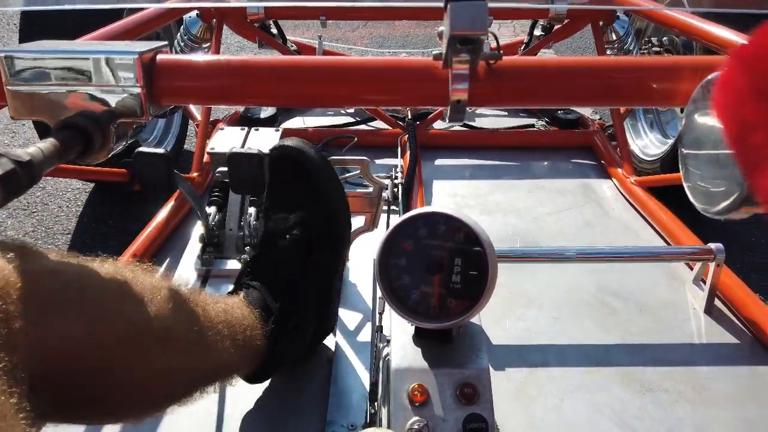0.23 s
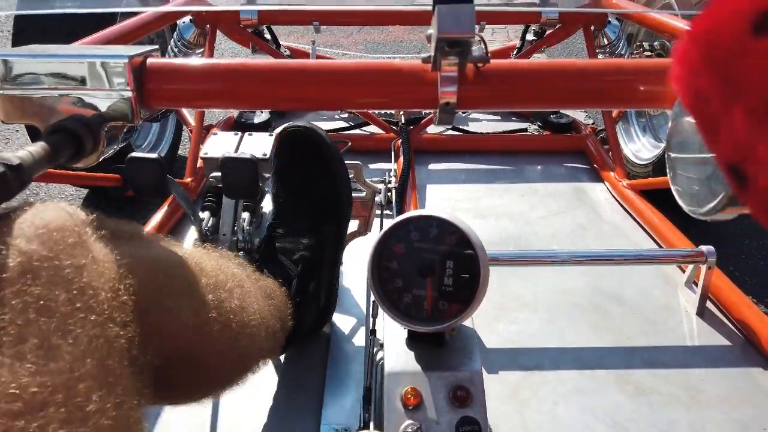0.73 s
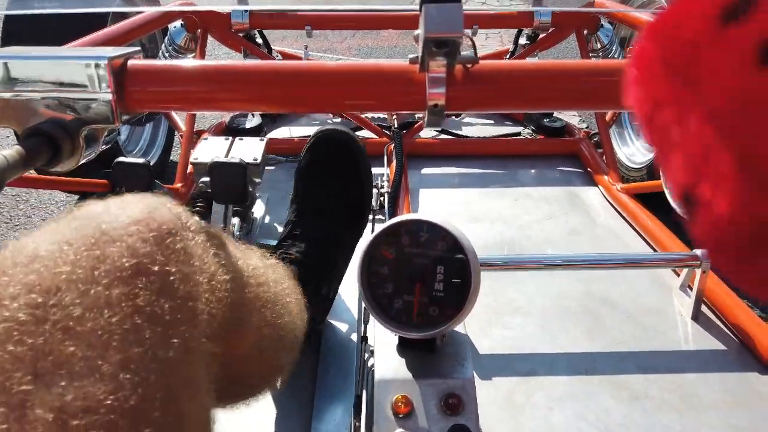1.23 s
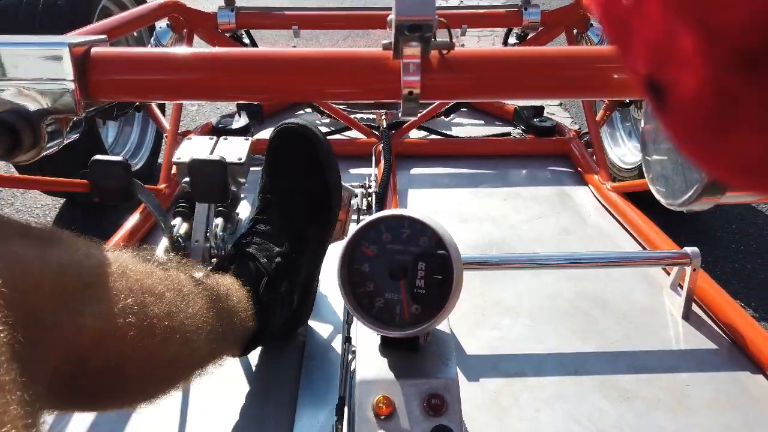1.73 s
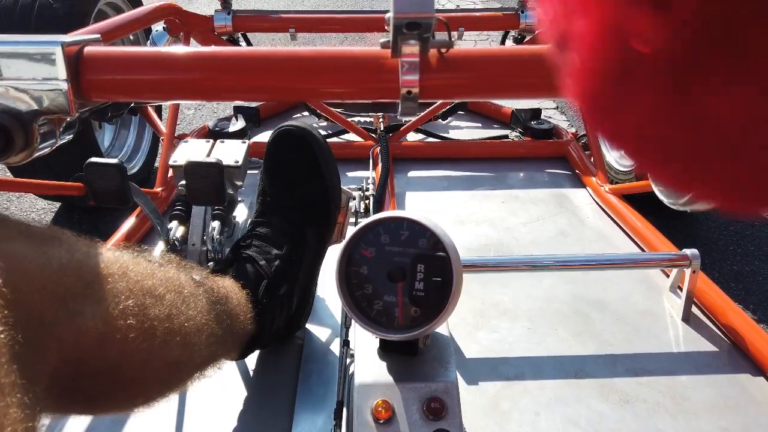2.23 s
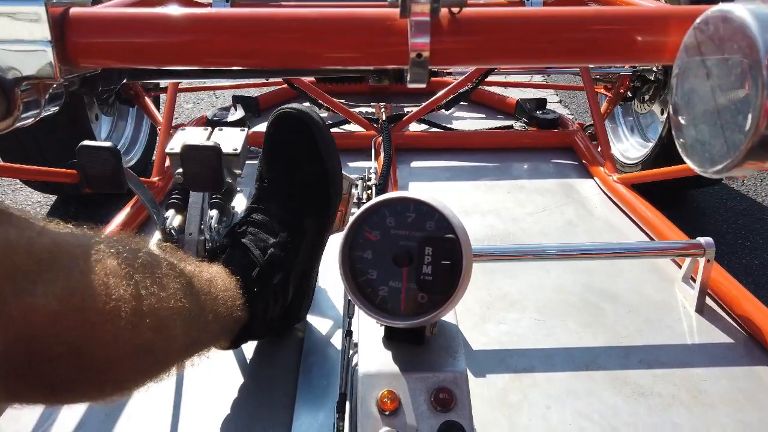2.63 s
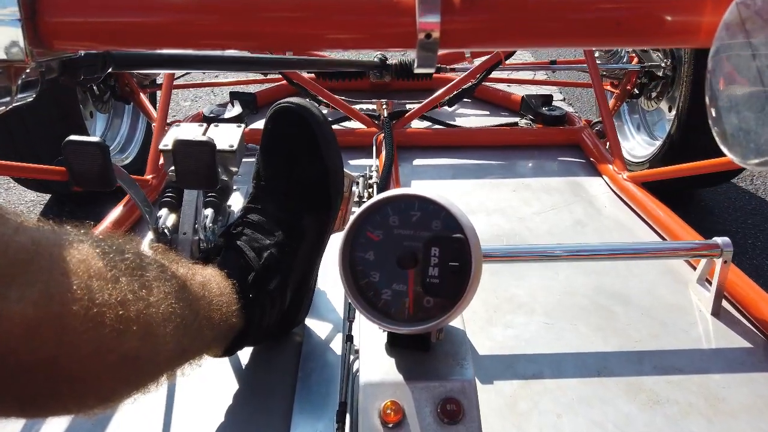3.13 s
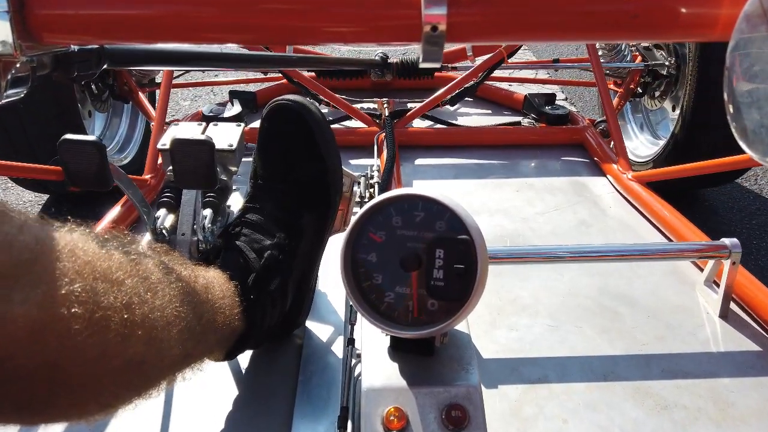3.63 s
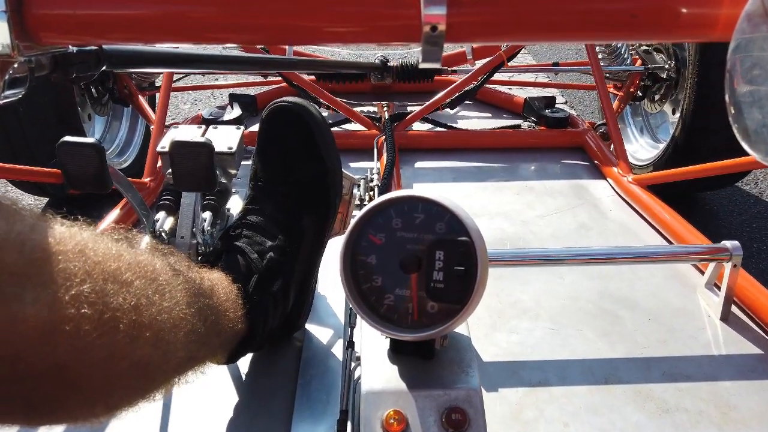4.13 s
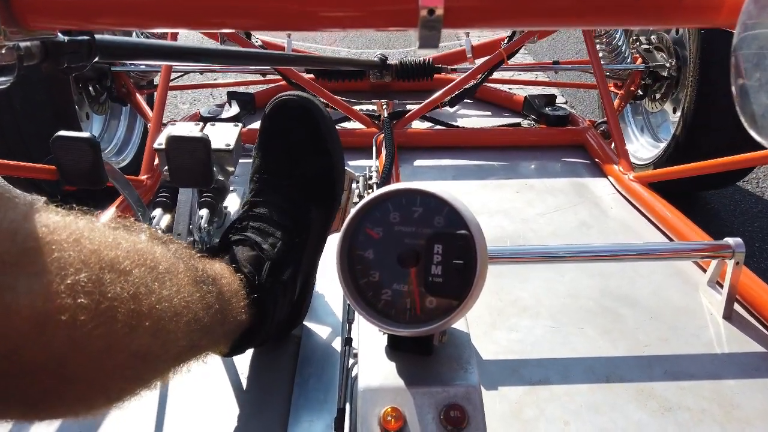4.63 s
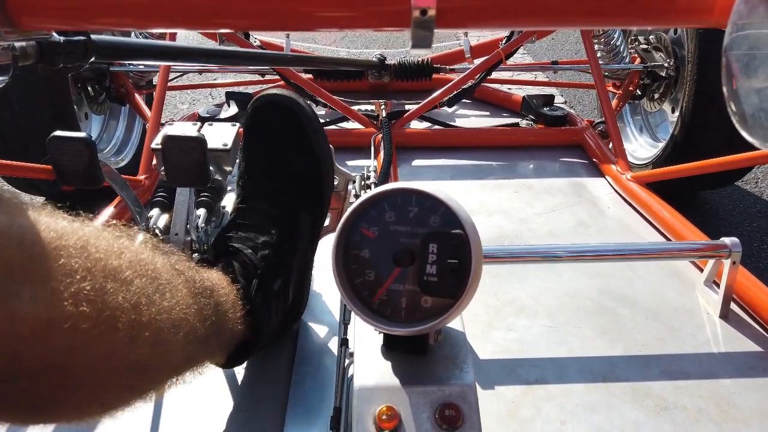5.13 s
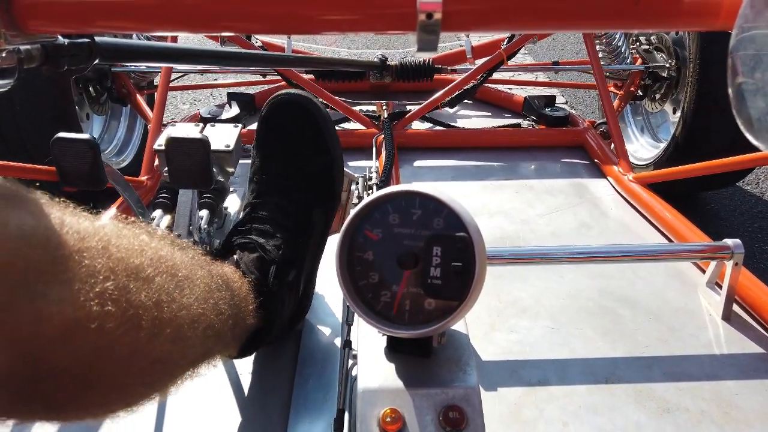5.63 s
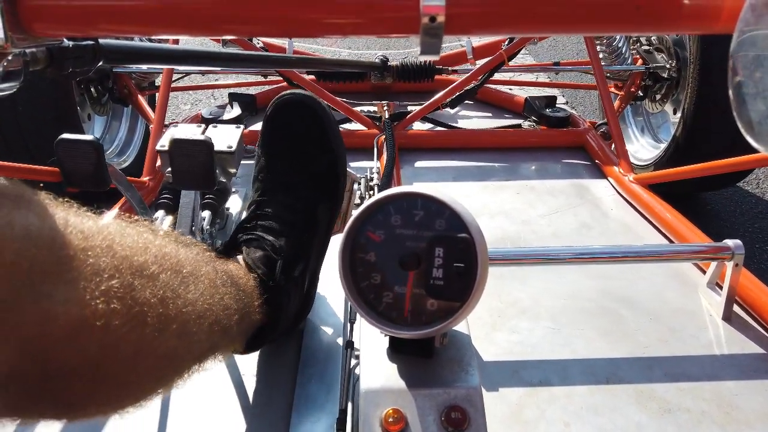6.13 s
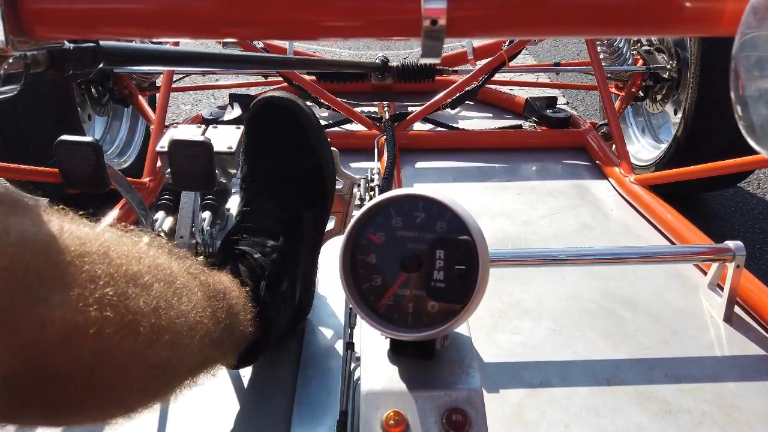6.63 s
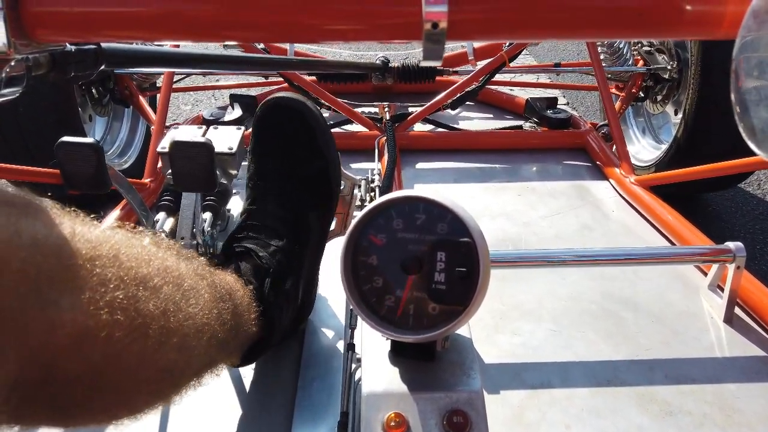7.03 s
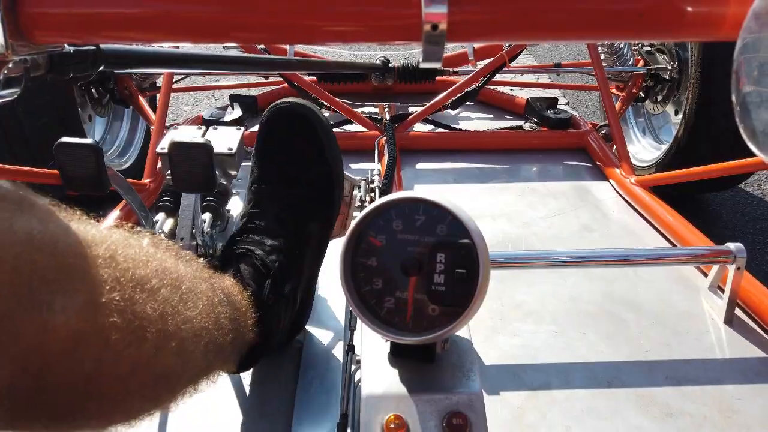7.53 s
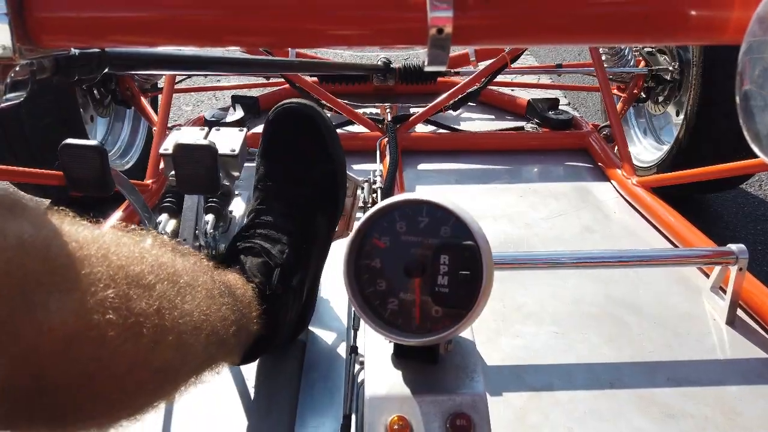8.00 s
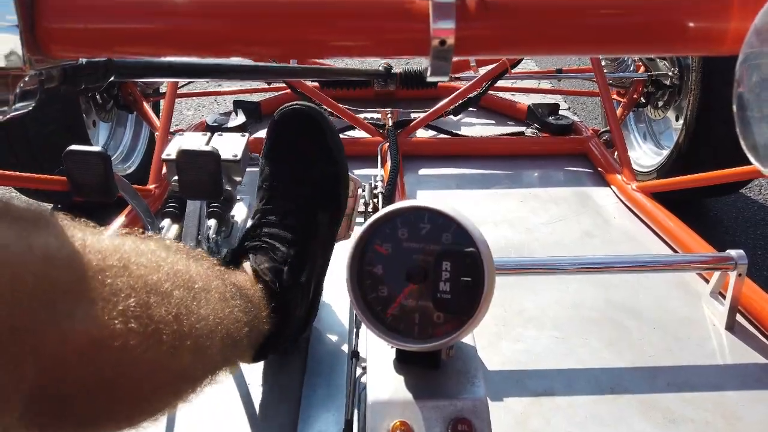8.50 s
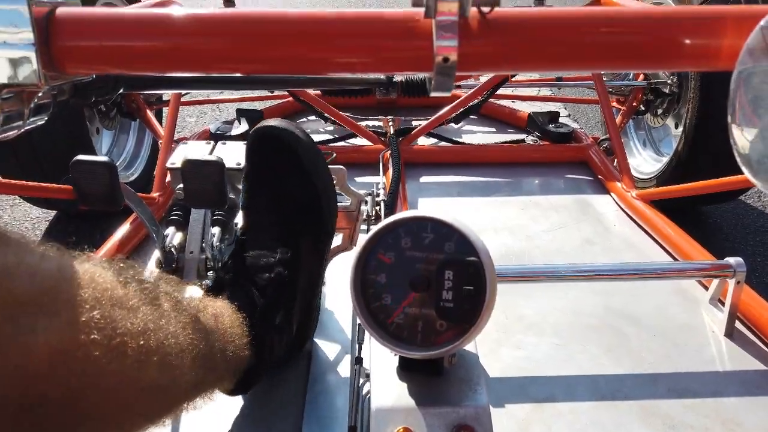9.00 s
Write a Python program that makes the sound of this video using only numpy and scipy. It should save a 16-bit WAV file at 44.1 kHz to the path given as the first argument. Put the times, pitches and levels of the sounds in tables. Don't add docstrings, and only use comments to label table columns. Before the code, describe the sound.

A small camera at the driver's seat hears a bassy, irregular exhaust putter, case rattle, airy fan noise and ticking valves for nearly five seconds. Three quick throttle stabs follow, with dry, high squeaks from the pedal linkage. Each swells into a rough exhaust blast and rushing air, then drops to a smooth descending hum. The last blip is strongest and is still winding down at the end. No room echo.

```python
import sys
import numpy as np
from scipy import signal
from scipy.fft import rfft, irfft, next_fast_len
from scipy.io import wavfile

SR = 44100
rng = np.random.default_rng(int(sys.argv[2]) if len(sys.argv) > 2 else 0)


def pcm_store(signal):
    levels = np.round(np.clip(np.atleast_2d(signal), -1, 1) * 32767)
    wavfile.write(sys.argv[1], SR, levels.astype(np.int16).T)


def volts_from_db(level):
    exponent = np.asarray(level, float) / 20
    return 10 ** exponent


N = 408366

# time in seconds, speed in turns per minute.
CRANK_SPEED = [(0.0, 785.3), (0.2, 789.0), (0.4, 755.1), (0.6, 771.8), (0.8, 754.1), (1.0, 800.5),
               (1.2, 769.2), (1.4, 775.5), (1.6, 783.0), (1.8, 776.9), (2.0, 792.5), (2.2, 794.4),
               (2.4, 808.2), (2.6, 800.6), (2.8, 792.6), (3.0, 761.5), (3.2, 778.6), (3.4, 794.9),
               (3.6, 787.4), (3.8, 816.8), (4.0, 800.2), (4.2, 782.6), (4.4, 761.0), (4.6, 764.2),
               (4.75, 821.5), (4.85, 864.1), (4.9, 1074.4), (4.96, 1507.4), (5.03, 2044.6), (5.08, 2376.4),
               (5.13, 2311.8), (5.25, 2040.8), (5.4, 1736.9), (5.6, 1405.0), (5.8, 1082.4), (6.0, 842.7),
               (6.15, 770.3), (6.26, 825.1), (6.31, 1147.5), (6.38, 1657.0), (6.45, 2135.1), (6.5, 2390.7),
               (6.56, 2253.0), (6.7, 1957.1), (6.85, 1675.4), (7.0, 1422.3), (7.2, 1127.3), (7.4, 884.7),
               (7.6, 746.0), (7.8, 718.4), (8.0, 752.6), (8.15, 762.2), (8.25, 853.7), (8.31, 1088.9),
               (8.4, 1624.7), (8.5, 2210.7), (8.6, 2927.0), (8.65, 3328.1), (8.72, 2763.6), (8.85, 2460.3),
               (9.0, 2151.5), (9.13, 1893.1), (9.26, 1599.6)]
# time in seconds, strength in dB against a full firing.
LEAN_FIRINGS = [(0.073, -6), (0.149, -29), (0.225, -25), (0.264, -0.5), (0.302, -9), (0.381, -5),
                (0.46, -17.5), (0.539, -1.5), (0.617, -22), (0.695, -16.5), (0.774, -2.5), (0.853, -4.5),
                (0.93, -28), (1.006, -19), (1.158, -27), (1.236, -16), (1.314, -7), (1.391, -6),
                (1.469, -6), (1.546, -20), (1.622, -1), (1.661, -5), (1.699, -4), (1.776, -16), (1.815, -1),
                (1.853, -21), (1.93, -1), (1.968, -2.5), (2.006, -3), (2.081, -29), (2.157, -6),
                (2.308, -26), (2.345, -1), (2.382, -13), (2.456, -1), (2.531, -8), (2.606, -27.5),
                (2.681, -25.5), (2.719, -1), (2.756, -14), (2.832, -11), (2.909, -21.5), (2.987, -11),
                (3.065, -8), (3.143, -11), (3.182, -1), (3.22, -6), (3.297, -4), (3.373, -32), (3.449, -19),
                (3.524, -14.5), (3.6, -12), (3.676, -27), (3.751, -8), (3.824, -21), (3.973, -16),
                (4.048, -16), (4.124, -32), (4.2, -7), (4.238, -3), (4.277, -26), (4.355, -17), (4.434, -7),
                (4.512, -6), (4.591, -5), (4.63, -4), (5.725, -8), (5.75, -8), (5.777, -5.5), (5.832, -26),
                (5.862, -14), (5.892, -12.5), (5.923, -9), (5.991, -28), (6.026, -9), (6.063, -3.5),
                (7.223, -19), (7.251, -22), (7.309, -30), (7.34, -1), (7.372, -13), (7.44, -10),
                (7.476, -4), (7.512, -13), (7.589, -29), (7.63, -0.5), (7.67, -24), (7.752, -21),
                (7.835, -1), (7.877, -1), (7.917, -12), (7.998, -10), (8.077, -1), (8.117, -1)]
# time in seconds, pipe ring in dB, open-throttle blast in dB, shut-throttle hum in dB.
EXHAUST_LEVELS = [(0, -16.5, -45, -40), (1, -17, -32, -48), (2, -19.5, -25, -43), (3, -18, -45, -44),
                  (4.1, -17, -36, -45), (4.55, -20, -43, -53), (4.8, -19.5, -23.5, -57),
                  (4.88, -20, -21.5, -60), (4.92, -23, -14.5, -60), (5.06, -22, -7.5, -47),
                  (5.09, -18, -9.5, -40), (5.13, -49, -27, -19.5), (5.35, -50, -44, -19),
                  (5.6, -48, -24, -26), (5.72, -18.5, -39, -36), (5.95, -20.5, -35, -40.5),
                  (6.25, -27.5, -33, -58), (6.3, -20, -13.5, -60), (6.45, -30, -9, -48),
                  (6.5, -20, -13.5, -33), (6.55, -33, -36, -19), (6.8, -50, -41, -20.5),
                  (7.05, -59, -27, -28.5), (7.2, -24.5, -45, -38), (7.55, -21.5, -43, -58),
                  (7.8, -24.5, -52, -60), (8.23, -28.5, -30.5, -60), (8.27, -17, -23, -60),
                  (8.4, -31, -10.5, -60), (8.55, -36, -3.5, -50), (8.63, -27, -8, -15),
                  (8.67, -52, -26, -19), (8.85, -53, -42, -24.5), (9.03, -50, -47, -20.5),
                  (9.26, -50, -48, -22.5)]
# pitch in Hz, level in dB, time to fade by 60 dB in seconds.
PIPE_MODES = [(53.3, 2.5, 0.33), (113, -20.5, 0.19), (157.2, 3.5, 0.15), (204, -10.5, 0.053),
              (420, -20, .1)]
# pitch in Hz, level in dB, time to fade by 60 dB in seconds.
BLAST_MODES = [(84.6, -2, 0.021), (164, 4.5, 0.045), (236, -19.5, 0.021), (375, 3, 0.033)]
# multiple of the firing rate, level in dB.
HUM_OVERTONES = [(1, 5), (2, -3.5), (3, -6.5), (4, -15.5)]
# pitch in Hz, level in dB.
HUM_PIPE_RESPONSE = [(40, -5.5), (60, -1.5), (95, -1), (110, -7), (150, 2), (185, -4), (225, -2),
                     (255, -10.5), (400, -17)]
# pitch in Hz, level in dB per Hz.
RASP_SPECTRUM = [(150, -32), (250, 1), (609, -8), (660, -5), (795, -11), (1350, -6), (2160, -14.5),
                 (2330, -22), (6000, -63), (7800, -68), (13200, -120)]
# time in seconds, clatter in dB, fan and intake hiss in dB.
NOISE_LEVELS = [
    [(0.0, -39.5, -46.5), (0.12, -41, -46.5), (1.95, -42.5, -45), (2.25, -42.5, -45), (2.57, -42, -45.5),
     (3.13, -49, -48), (3.3, -42.5, -44.5), (4.23, -44.5, -49), (4.33, -46, -49), (4.61, -44.5, -50),
     (4.7, -44.5, -47)],
    [(4.75, -45.5, -46), (4.89, -44.5, -46), (4.91, -27, -39), (4.92, -41, -41), (4.94, -33.5, -44),
     (5.04, -30, -36.5), (5.2, -35.5, -39), (5.62, -41, -44.5), (5.97, -47, -51.5), (6.04, -50, -54.5),
     (6.26, -48, -52), (6.29, -39.5, -44), (6.38, -31, -37), (6.43, -30, -37.5), (6.57, -36, -38.5),
     (7.09, -42.5, -46), (7.39, -48.5, -52), (7.7, -52.5, -56.5), (8.24, -53, -54.5), (8.27, -37, -42),
     (8.28, -45, -46.5), (8.42, -29.5, -37.5), (8.57, -27.5, -33), (8.71, -32, -33.5), (9.25, -38.5, -42.5),
     (9.26, -42, -39)],
]
# pitch in Hz, level in dB per Hz.
CLATTER_SPECTRUM = [(120, -10.5), (200, 4.5), (258, -13), (431, -9), (513, -15), (739, -19.5), (812, -20.5),
                    (980, -13.5), (3570, -24.5), (5000, -31), (6500, -56), (11000, -120)]
# pitch in Hz, width in Hz, boost in dB.
CASE_PANELS = [(445, 34, 5.5), (740, 91, 10.5), (984, 13, 2), (1360, 72, 0.5)]
# pitch in Hz, level in dB per Hz.
HISS_SPECTRUM = [(1180, -18), (2000, -6), (2710, -5), (3400, -12.5), (3610, -11), (4300, -13.5),
                 (7910, -11), (9330, -15), (10400, -8), (15200, -17.5), (16000, -28)]
# pitch in Hz, level in dB per Hz.
TICK_SPECTRUM = [(1290, -30), (2200, -9), (2390, -5), (3420, 0), (3590, -5), (4270, -5.5), (5760, -8),
                 (6920, -13.5), (9330, -10.5), (10300, -10), (16000, -9)]
# pitch in Hz, width in Hz, boost in dB.
ROCKER_RINGS = [(3018, 70, 7), (3636, 41, 20.5), (10100, 200, 8), (11000, 670, 7)]
# place in firings, level in dB over the hiss, decay in seconds.
VALVE_TICKS = [(1.14, 18, 0.0085), (2.315, 16, 0.012), (3.25, 13.5, 0.0064), (0.38, 12, 0.0056)]
# pitch in Hz, level in dB per Hz.
LEAK_SPECTRUM = [(4500, -27), (6000, -6.5), (6900, -4.5), (8000, -2.5), (9500, -21)]
# time in seconds, peak level in dB, pitch in Hz, length in seconds.
PEDAL_SQUEAKS = [(4.86, -21, 7440, 0.0099), (4.889, -14.5, 7400, 0.0099), (6.2264, -28, 8500, 0.016),
                 (6.2597, -15.5, 7050, 0.011), (7.854, -28.5, 8400, 0.011), (8.2352, -25, 6990, 0.011),
                 (8.244, -15, 6750, 0.013), (8.302, -17.5, 7660, 0.011), (8.326, -19.5, 6920, 0.0086)]
# pitch in Hz, width in Hz, boost in dB.
LINKAGE_RINGS = [(6930, 39, 15), (7250, 90, 0), (7550, 110, 9), (8340, 82, 15)]
# pitch in Hz, likeness from 0 to 1.
LEFT_RIGHT_LIKENESS = [(300, 1.0), (700, .93), (1400, 0.85), (3000, 0.59), (7000, 0.21), (15000, 0.2)]


def in_time(rows):
    s, *columns = np.transpose(rows)
    return [np.interp(np.arange(N) / SR, s, column) for column in columns]


def at_hz(points, hz):
    points = np.array(points)
    return np.interp(np.log(hz), np.log(points[:, 0]), points[:, 1])


def drift(rate):
    knots = rng.standard_normal(int(N / SR * rate) + 3)
    return np.interp(np.arange(N) / SR * rate, np.arange(len(knots)), knots) * np.sqrt(3 / 2)


def stereo_noise(spectrum, peaks=()):
    size = next_fast_len(N)
    hz = np.arange(size // 2 + 1) * SR / size + 1
    shape_db = at_hz(spectrum, hz)
    for centre, width, db in peaks:
        shape_db = shape_db + db / (1 + (2 * (hz - centre) / width) ** 2)
    alike = np.clip(at_hz(LEFT_RIGHT_LIKENESS, hz), -1, 1)
    white = rfft(rng.standard_normal((2, size)))
    mid, side = white * volts_from_db(shape_db) * np.sqrt([1 + alike, 1 - alike])
    both = irfft([mid + side, mid - side], size)[:, :N]
    return both / np.sqrt(np.mean(both ** 2))


def crank():
    rate = in_time(CRANK_SPEED)[0] / 30
    first_firing = -0.935
    return first_firing + np.cumsum(rate) / SR, rate


def firings(count, spread_db):
    at = np.flatnonzero(np.diff(np.floor(count)) > 0)
    level_db = spread_db * rng.standard_normal(len(at))
    for s, db in LEAN_FIRINGS:
        nearest = np.argmin(abs(at - s * SR))
        level_db[nearest] = db
    clicks = np.zeros(N)
    clicks[at] = volts_from_db(level_db)
    return clicks


def ring(push, modes, crest_s):
    out = 0
    for hz, db, t60 in modes:
        shrink = volts_from_db(-60 / (t60 * SR))
        turn = 2 * np.pi * hz / SR
        late = 2 * np.pi * hz * crest_s
        start = [np.cos(late), -shrink * np.cos(turn + late)]
        swing = [1, -2 * shrink * np.cos(turn), shrink * shrink]
        out = out + volts_from_db(db) * signal.lfilter(start, swing, push + 1e-18)
    return out


def outflow(clicks, modes, width_s):
    valve = np.hanning(int(width_s * SR))
    early = np.roll(clicks, -len(valve) // 3)
    pulses = np.convolve(early, valve / valve.sum(), "same")
    return -ring(pulses, modes, width_s / 3)


def overrun_hum(count, rate, hum_db):
    lag_s, shift = 0.022, 1.8
    late = count - lag_s * rate + shift
    hum = 0
    for k, db in HUM_OVERTONES:
        level_db = hum_db + db + at_hz(HUM_PIPE_RESPONSE, k * rate) + 0.9 * drift(18.0)
        hum = hum - volts_from_db(level_db) * np.sqrt(2) * np.cos(2 * np.pi * k * late)
    return hum


def exhaust(count, rate):
    pipe_db, blast_db, hum_db = in_time(EXHAUST_LEVELS)
    clicks = firings(count, spread_db=1.77)
    idle_ring = outflow(volts_from_db(pipe_db) * clicks, PIPE_MODES, width_s=0.0055)
    blast = outflow(volts_from_db(blast_db) * clicks, BLAST_MODES, width_s=0.0042)
    hum = overrun_hum(count, rate, hum_db)
    gust = 0.2 + np.exp(-(count % 1) / rate / 0.005)
    roar = stereo_noise(RASP_SPECTRUM, [(1310, 100, 2.4), (2120, 330, 4.6), (2800, 200, 4)])
    rasp = volts_from_db(blast_db - 14 + 2.3 * drift(40.0)) * gust * roar
    return idle_ring + blast + hum + rasp


def case_clatter(count, clatter_db):
    throb = 1 + 0.18 * np.cos(2 * np.pi * (count - 0.1))
    level = volts_from_db(clatter_db + 3.5 + 1.03 * drift(25.0))
    return level * throb * stereo_noise(CLATTER_SPECTRUM, CASE_PANELS)


def fan_hiss(hiss_db):
    return volts_from_db(hiss_db + 2.2 * drift(30.0)) * stereo_noise(HISS_SPECTRUM)


def valve_train(count, rate, hiss_db):
    place = count + 0.008 * (rate - 26)
    bursts = 0
    for at, db, decay_s in VALVE_TICKS:
        cycle, within = np.divmod(place - at, 4)
        strength = volts_from_db(db + 1.3 * rng.standard_normal(100))
        since = within / rate
        shape = (1 - np.exp(-since / 0.0032)) * np.exp(-since / decay_s)
        bursts = bursts + strength[cycle.astype(int) + 1] * shape
    from_puff = (place - 2.15 + 2) % 4 - 2
    puff = np.exp(-(from_puff / 0.45) ** 2)
    ticks = bursts * stereo_noise(TICK_SPECTRUM, ROCKER_RINGS)
    leak = volts_from_db(1) * puff * stereo_noise(LEAK_SPECTRUM, LINKAGE_RINGS[:1])
    fade_db = -0.2 * (rate - 26)
    return volts_from_db(hiss_db + fade_db) * (ticks + leak)


def pedal():
    colour = [(2500, -26), (4800, -13), (6400, -15), (7000, -5), (8600, -6.5), (10500, -8), (16000, -8)]
    squeal = stereo_noise(colour, LINKAGE_RINGS)
    out = np.zeros((2, N))
    t = np.arange(1600) / SR
    for s, db, hz, length_s in PEDAL_SQUEAKS:
        start = int(s * SR) - 60
        span = slice(start, start + len(t))
        shape = (1 - np.exp(-t / 0.0021)) * np.exp(-(t / length_s) ** 2)
        band = signal.butter(1, [hz * 0.85, hz * 1.18], "band", fs=SR, output="sos")
        out[:, span] += volts_from_db(db) * shape * signal.sosfilt(band, squeal[:, span])
    return out


def scene():
    count, rate = crank()
    clatter_db, hiss_db = in_time(np.concatenate(NOISE_LEVELS))
    engine = exhaust(count, rate) + case_clatter(count, clatter_db) + fan_hiss(hiss_db)
    return engine + valve_train(count, rate, hiss_db) + pedal()


def roll_off(x):
    return signal.sosfilt(signal.butter(12, 16560, fs=SR, output="sos"), x)


def record(dry):
    ports = np.array([dry[0], np.roll(dry[1], 2)])
    rumble_cut = signal.butter(1, 12, "high", fs=SR, output="sos")
    top_cut = signal.cheby2(12, 60, 16050, fs=SR, output="sos")
    ports = signal.sosfilt(top_cut, signal.sosfilt(rumble_cut, ports))
    mix = 1.121 * np.tanh(ports / 1.05)
    return roll_off(mix)


dry = scene()
out = record(dry)
pcm_store(out)
```